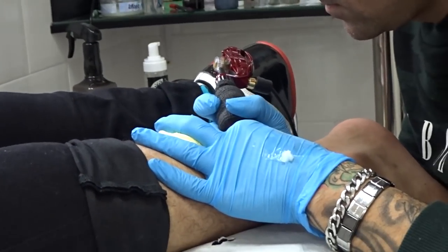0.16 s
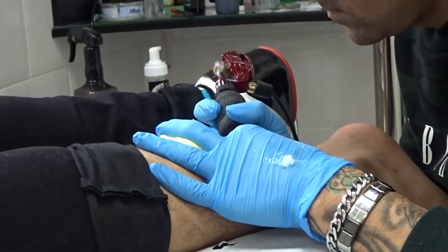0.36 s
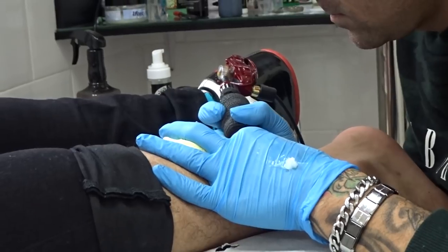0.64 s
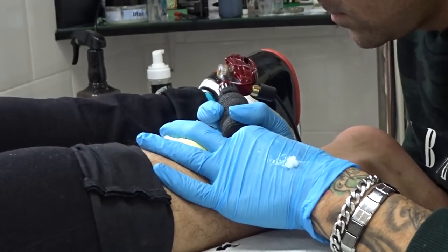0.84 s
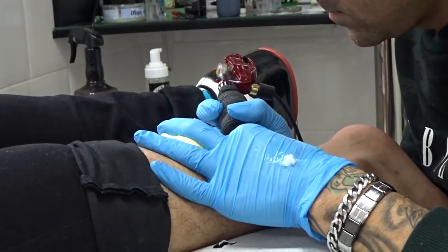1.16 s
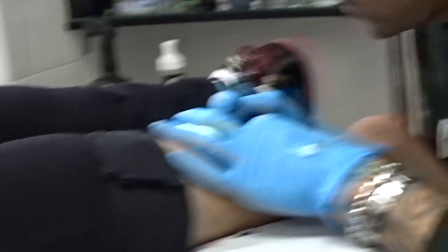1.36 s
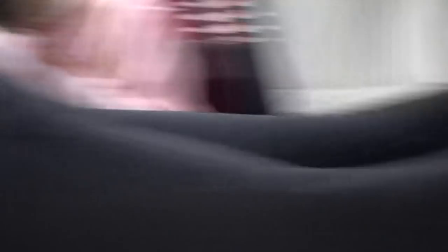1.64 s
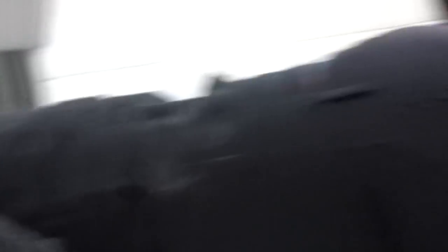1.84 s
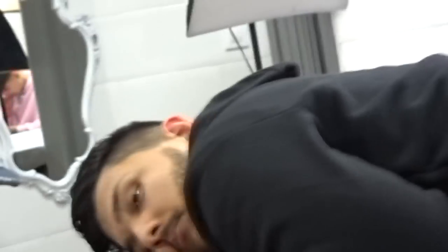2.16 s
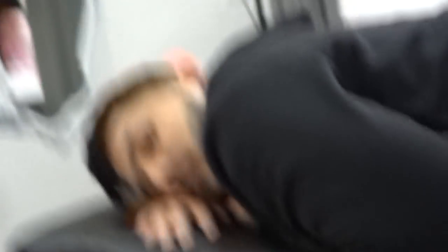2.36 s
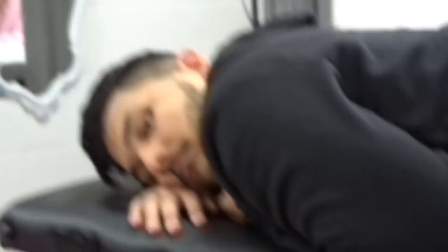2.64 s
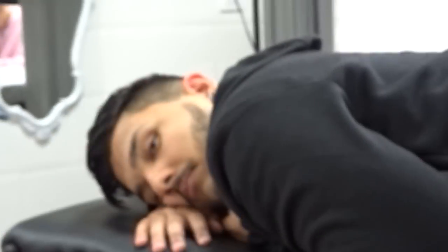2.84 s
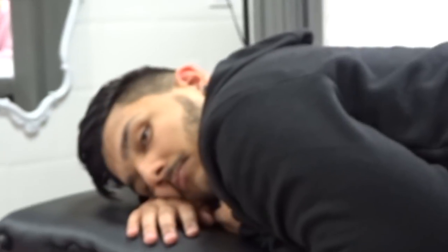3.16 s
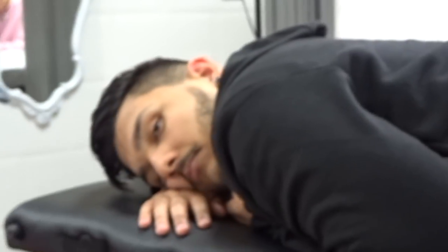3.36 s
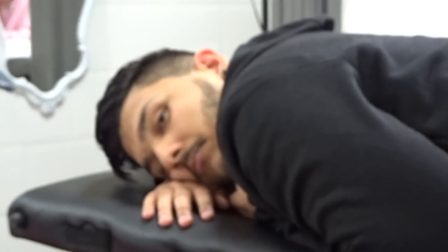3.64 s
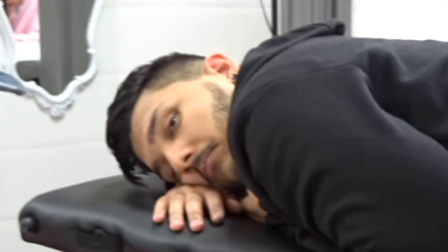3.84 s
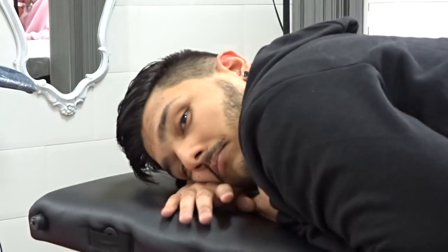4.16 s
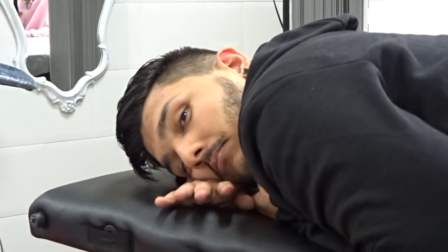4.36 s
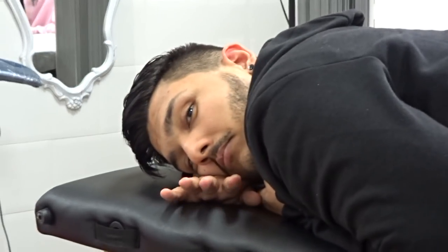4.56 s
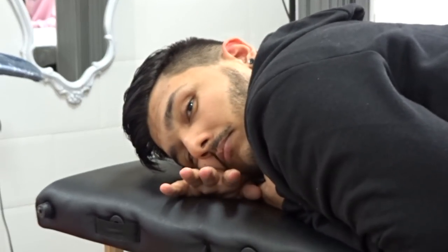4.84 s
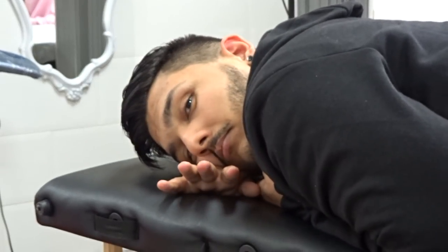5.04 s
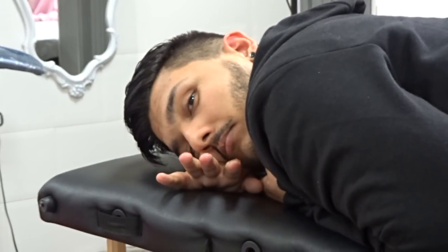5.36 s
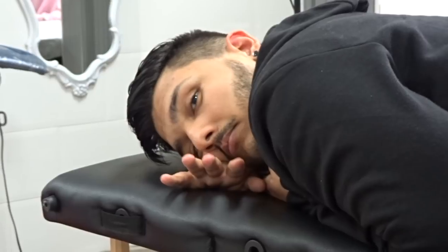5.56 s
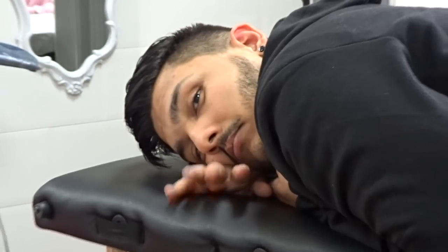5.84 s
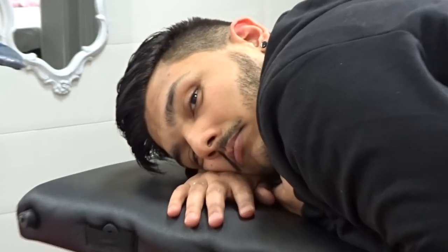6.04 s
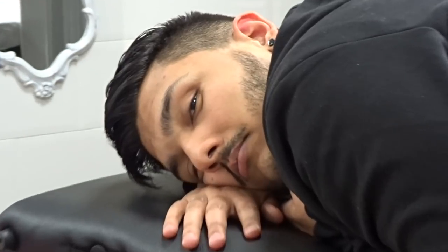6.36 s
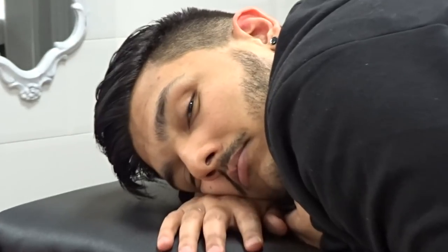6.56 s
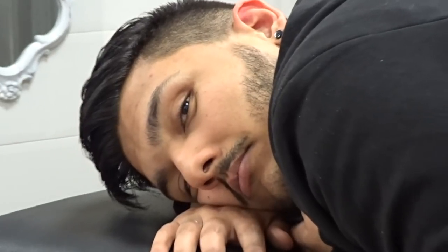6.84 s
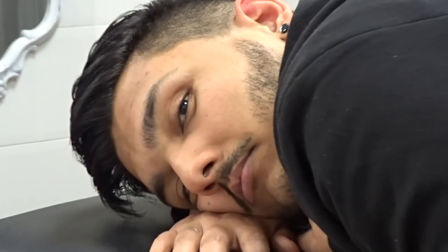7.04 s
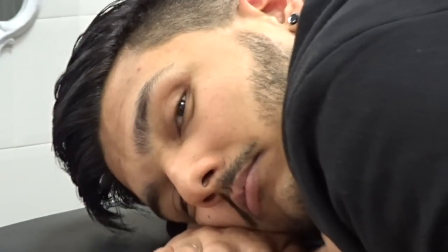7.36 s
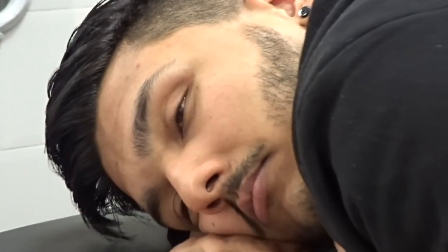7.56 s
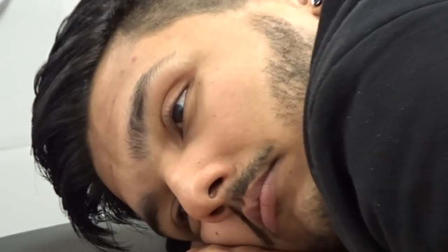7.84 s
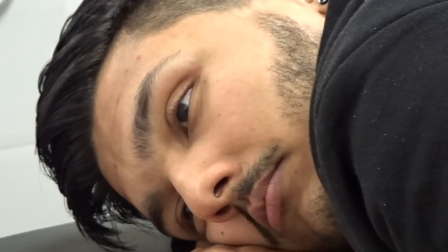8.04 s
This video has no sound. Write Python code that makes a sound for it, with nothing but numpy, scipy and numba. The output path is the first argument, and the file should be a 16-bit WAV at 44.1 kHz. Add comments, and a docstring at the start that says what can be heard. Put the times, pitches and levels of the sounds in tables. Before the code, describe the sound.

Thin, wavering electric whine with metallic rattle, weakening after a loud snap at two seconds; light knocks, then soft wiping and a final small click.

```python
"""In a small tiled studio a rotary tattoo machine whines, heard by a hand-held camera that turns away from it.
Sines at sums of its shaft and ball rates make the tones; taps of the balls of a worn bearing ring casing modes.
Filtered noise hisses through the room; a sharp click, small clicks, knocks, wipes, blips and a faint hum
are added. Gain control ducks a few milliseconds after the loudest peaks and creeps back."""
import sys
import numpy as np
from scipy import signal
from scipy.fft import rfft, irfft
from scipy.io import wavfile
from scipy.ndimage import uniform_filter1d, map_coordinates
from numba import njit

SR = 44100
rng = np.random.default_rng(int(sys.argv[2]) if len(sys.argv) > 2 else 0)


def unload_wav(signal):
    """Save mono or channel-first audio to the path in sys.argv[1] as 16-bit WAV at rate SR, clipped to [-1, 1]."""
    wavfile.write(
        sys.argv[1],
        SR,
        np.round(np.clip(np.atleast_2d(signal).T, -1, 1) * 32767).astype(np.int16),
    )


N = 361158
T = np.arange(N) / SR


def undb(db):
    """Amplitude ratio of a level in decibels."""
    return 10 ** (np.asarray(db) / 20)


def unit(x):
    """Normalisation to an rms of 1."""
    return x / np.sqrt(np.mean(x ** 2))


def columns(table):
    """Linear interpolation: every column after the time, at each sample."""
    s, *rest = np.transpose(table)
    return [np.interp(T, s, c) for c in rest]


def at_hz(points):
    """Interpolation over log frequency: a (hz, value) table on the transform's bins."""
    hz, value = np.transpose(points)
    return np.interp(np.log(np.fft.rfftfreq(N, 1 / SR) + 1), np.log(hz), value)


def ring(x, hz, width_hz):
    """Resonance: one second-order mode with gain 1 at its centre."""
    return signal.lfilter(*signal.iirpeak(hz, hz / width_hz, fs=SR), x)


def walk(rate):
    """Slow random modulation: normal values held 1 / rate s, then smoothed twice."""
    hold = int(SR / rate)
    steps = np.repeat(rng.standard_normal(N // hold + 1), hold)
    return uniform_filter1d(uniform_filter1d(steps, hold), hold)[:N]


# likeness of left and right in a diffuse field: hz [Hz], likeness [-1 to 1]
LIKENESS = [(60, 0.31), (130, 0.92), (290, 1), (640, 0.89), (1410, 0.62), (3100, 0.38), (6820, -0.33),
            (15000, 0.19)]


def hiss(colour, spread=0.92):
    """Diffuse-field noise: a coloured spectrum, with likeness of the sides set by frequency and spread."""
    alike = np.clip(1 - spread * (1 - at_hz(LIKENESS)), -1, 1)
    shape = undb(at_hz(colour))
    mid = rfft(rng.standard_normal(N)) * shape * np.sqrt(1 + alike)
    side = rfft(rng.standard_normal(N)) * shape * np.sqrt(1 - alike)
    return unit(irfft([mid + side, mid - side], N))


def place(x, pan_db, lag_s):
    """Localisation by level and time differences: the left side hears x lag_s later."""
    left = map_coordinates(x, [np.arange(N) - lag_s * SR], order=3)
    return np.array([left * undb(pan_db / 2), x * undb(-pan_db / 2)])


def echo(x, t60_s):
    """Reverberation: a decaying noise response, unrelated left and right, of unit energy."""
    s = np.arange(int(t60_s * SR)) / SR
    tail = rng.standard_normal((2, len(s))) * np.exp(-np.log(1000) * s / t60_s)
    tail = tail / np.sqrt(np.sum(tail ** 2, axis=1, keepdims=True))
    return signal.fftconvolve(x[None], tail, axes=1)[:, :N]


SWAYS_PER_S = 2.5  # the hand never holds still, so the pattern of reflections keeps changing


def swaying_echo(x, t60_s, count):
    """Changing reflections: several returns of the walls blended by drifting shares of equal total power."""
    share = np.array([walk(SWAYS_PER_S) for _ in range(count)])
    share = share / np.sqrt(np.sum(share ** 2, axis=0))
    return sum(echo(x * w, t60_s) for w in share)


FREE_WHINE_HZ = 2412  # whine of the unloaded motor
# needle strokes that slow the motor: slowest_s [s], whine_drop_hz [Hz], press_s [s], lift_s [s]
NEEDLE_STROKES = [(0.541, 21.6, 0.6, 0.19), (1.079, 16.3, 0.41, 0.41), (1.64, 25.2, 0.23, 0.12),
                  (2.15, 14.8, 0.45, 0.45), (2.641, 18.2, 0.35, 0.46), (2.95, 15.9, 0.14, 0.87),
                  (3.68, 27.7, 0.22, 0.24), (4.32, 22.2, 0.26, 0.27), (4.899, 24.4, 0.47, 0.58),
                  (5.649, 14.1, 0.11, 0.49), (5.981, 17, 0.2, 0.9), (6.71, 22.6, 0.2, 0.23),
                  (7.2, 21.6, 0.27, 0.098), (7.62, 21.3, 0.32, 0.12), (8.29, 30, 0.58, 0.7)]


def whine_pitch():
    """Speed under load: the free pitch less a smooth sag per stroke, deepening in the press, easing in the lift."""
    sag_hz = 0
    for slowest_s, drop_hz, press_s, lift_s in NEEDLE_STROKES:
        width_s = np.where(T < slowest_s, press_s, lift_s)
        sag_hz = sag_hz + drop_hz * np.exp(-2 * ((T - slowest_s) / width_s) ** 2)
    return FREE_WHINE_HZ - sag_hz


# orders below count cycles per ball passage; the whine and upper tone have their own levels
BALLS_PER_TURN, WHINE_ORDER, UPPER_ORDER = 4.378, 6, 7
# frequency of each tone as a sum: ball_multiple [count], shaft_multiple [count]
TONE_ORDERS = [(0, 7), (0, 13), (3, 0), (0, 15), (0, 17), (0, 18), (0, 19), (0, 20), (5, 0), (5, 1),
               (6, -1), (6, 0), (5, 5), (6, 1), (6, 2), (7, -2), (7, 0), (8, -4), (7, 1), (8, -2), (8, -1),
               (8, 0), (8, 1), (8, 2), (8, 3), (8, 4), (9, 0), (8, 5), (9, 1), (10, 0), (0, 3), (0, 4),
               (0, 9), (0, 10), (0, 16), (0, 21), (5, 6), (7, -3), (11, -5), (4, 13), (3, 20)]
# offset of each tone from the level that drives it: facing_db [dB], away_db [dB]
TONE_OFFSETS = [(-27.5, -27.5), (-53, -26), (-35, -26.5), (-21, -20), (-34, -28), (-23, -23), (-54, -25),
                (-25, -32), (-14.5, -12.5), (-27, -20), (-22, -21), (0.5, 1.5), (-15, -14.5), (-4.5, -8),
                (-37, -12), (-17, -21), (1, 2), (-28, -22), (-26, -20), (-22, -28), (-33, -20), (-20, -16),
                (-21, -21.5), (-17, -16), (-19, -26), (-26, -23), (-17, -22), (-34, -33), (-24, -18.5),
                (-20, -35), (-34.5, -37.5), (-35, -38.5), (-33, -28), (-30.5, -33.5), (-25.5, -28),
                (-27, -25.5), (-24, -15.5), (-35, -30), (-21.5, -25), (-36, -24), (-38, -25.5)]


def tones(ball, turn, whine_db, upper_db, others_db, dull_db):
    """Line spectrum of a rotating machine: sums of ball and shaft rates with one shared phase tremble."""
    out, tremble = 0, 0.003 * walk(120)
    for (balls, shafts), (facing_db, away_db) in zip(TONE_ORDERS, TONE_OFFSETS):
        order = balls + shafts / BALLS_PER_TURN
        cycles = (ball + tremble) * order + rng.random()
        if (balls, shafts) == (WHINE_ORDER, 0):
            level_db = whine_db + 0.8 * walk(110)
        elif (balls, shafts) == (UPPER_ORDER, 0):
            level_db = upper_db + 2.7 * walk(25)
        else:
            dull_share = np.clip((order - 6.5) / 2.32, 0, 1)
            level_db = others_db + 3.26 * walk(12) + 2.2 * walk(3.06) + dull_db * dull_share
        offset_db = facing_db + (away_db - facing_db) * turn
        out = out + undb(offset_db + level_db) * np.sin(2 * np.pi * cycles)
    return np.sqrt(2) * out


# casing resonances: hz [Hz], width of one filter pass [Hz], facing_db [dB], away_db [dB]
CASING_MODES = [(2470, 23, -11.5, -12), (2567, 230, -8, -7), (3510, 670, -14, -13.5),
                (5290, 130, -12, -16.5), (5680, 150, -13.5, -12), (6357, 370, 1.5, 3), (6574, 260, -8, -4),
                (7370, 390, -9.5, -9), (9060, 900, -7.5, -4), (14800, 1000, -26, -21.5)]
# beats of the rattle: ball_multiple [count], shaft_multiple [count]
LOAD_BEATS = [(0, 1), (1, -1), (1, -2), (1, -3)]
# depth of each beat: depth [nepers]
LOAD_DEPTHS = [0.19, 0.15, 0.51, 0.3]


def rattle(ball, turn):
    """Modal excitation: ball taps and rolling noise, harder on the loaded side of the shaft, ring the casing."""
    tap = np.flatnonzero(np.diff(np.floor(ball)))
    jitter, strength = rng.standard_normal((len(tap), 2)).T
    load_nepers = 0
    for (balls, shafts), depth in zip(LOAD_BEATS, LOAD_DEPTHS):
        load_nepers = load_nepers + depth * np.cos(2 * np.pi * ball * (balls + shafts / BALLS_PER_TURN))
    taps = np.zeros(N)
    tap_at = np.clip(tap + np.round(2.2 * jitter).astype(int), 0, N - 1)
    np.add.at(taps, tap_at, undb(strength))  # scatter of 1 dB
    drive = np.exp(load_nepers) * (undb(-5.0) * unit(taps) + rng.standard_normal(N))
    out = 0
    for hz, width_hz, facing_db, away_db in CASING_MODES:
        mode_db = facing_db + (away_db - facing_db) * turn + 0.43 * walk(12)
        out = out + undb(mode_db) * unit(ring(ring(drive, hz, width_hz), hz, 0.99 * width_hz))
    return out


JOLT_HZ, JOLT_S = 2454, 0.0015  # JOLT_S: Gaussian width of a ping
# random jolts: the weakest level, and the mean excess above it
SMALL_JOLTS_PER_S, SMALL_JOLT_LEAST_DB, SMALL_JOLT_EXCESS_DB = 20, -38, 2.5
# strong jolts of the needle bar that ping the casing: top_s [s], level_db [dB, peak before placing]
STRONG_JOLTS = [(3.243, -25), (3.541, -26), (3.826, -24), (3.859, -25), (5.119, -31), (5.839, -24),
                (5.874, -25), (5.927, -31), (5.961, -27), (6.049, -29), (6.137, -34), (6.226, -37),
                (6.561, -31), (6.575, -24), (6.608, -23), (6.640, -27), (7.493, -28)]


def jolts():
    """Impulsive excitation: pings of a few milliseconds, the strong ones listed and weaker ones at random."""
    chance = rng.random((int(SMALL_JOLTS_PER_S * N / SR), 2))
    small_db = SMALL_JOLT_LEAST_DB - SMALL_JOLT_EXCESS_DB * np.log(chance[:, 1])
    small = np.c_[chance[:, 0] * N / SR, small_db]
    s, db = np.r_[STRONG_JOLTS, small].T
    kicks, around = np.zeros(N), np.arange(-512, 513) / SR
    np.add.at(kicks, (s * SR).astype(int), undb(db))
    ping = np.exp(-.5 * (around / JOLT_S) ** 2) * np.cos(2 * np.pi * JOLT_HZ * around)
    return signal.fftconvolve(kicks, ping, mode="same")


EAR_LAG_S = 7.2e-5  # left behind right once the machine is off to the right
SHADE_S, SHADE_WIDTH_S, SHADE_DB = 2.02, .13, -8  # tones other than whine and upper fade for a moment
# drive of the whine: time_s [s], level_db [dB]
WHINE_LEVEL = [(0, -30.5), (.13, -34.5), (.4, -30), (.62, -34), (1.25, -31.5), (1.5, -35.5), (1.7, -35.5),
               (1.8, -42), (1.92, -46), (1.98, -41), (2.06, -43), (2.12, -33), (2.4, -40.5), (2.55, -34.5),
               (2.64, -43.5), (2.8, -36.5), (3.55, -35), (3.72, -29), (3.79, -38.5), (4.07, -28),
               (4.29, -36.5), (4.45, -30.5), (4.82, -38.5), (4.93, -31.5), (5.07, -38), (5.4, -29),
               (5.5, -34), (5.57, -29.5), (5.9, -38), (6.27, -33), (6.62, -34.5), (6.73, -32), (6.98, -32),
               (7.16, -36), (7.39, -29), (7.55, -37.5), (7.96, -31), (8.19, -38)]
# drive of the tone one ball multiple above the whine: time_s [s], level_db [dB]
UPPER_LEVEL = [(0, -47), (.3, -41), (.55, -52), (.77, -39.5), (1.09, -47), (1.35, -40), (1.62, -46),
               (1.9, -46), (2.3, -56), (3.3, -55.5), (4.3, -49), (4.54, -64), (4.86, -51), (5.5, -51),
               (5.75, -61), (6.05, -51), (6.4, -69), (6.74, -52), (6.9, -57), (7.87, -54), (8.19, -43)]
# casing rattle and side of the machine: time_s [s], rattle_db [dB], left_minus_right_db [dB]
RATTLE_AND_PAN = [(0, -30.5, -1.5), (0.6, -31, -3), (1.6, -30.5, -4.5), (2.0, -33.5, -8), (2.1, -31.5, 4),
                  (2.2, -35.5, -7.5), (3.3, -36.5, -3), (4.3, -34.5, -3.5), (5.6, -34.5, -2.5),
                  (5.9, -35, -5), (6.6, -35.5, -5), (7.5, -34.5, -4), (8.19, -35, -4)]


def machine(turn, dull_db):
    """Direct and reflected sound: tones and rattle share one speed; the rattle comes largely off the tiles."""
    whine_db, = columns(WHINE_LEVEL)
    upper_db, = columns(UPPER_LEVEL)
    rattle_db, pan_db = columns(RATTLE_AND_PAN)
    ball = np.cumsum(whine_pitch()) / WHINE_ORDER / SR  # ball passages so far
    shade_db = SHADE_DB * np.exp(-.5 * ((T - SHADE_S) / SHADE_WIDTH_S) ** 2)
    others_db = rattle_db + 2.37 * turn - 3.0 + shade_db
    pure = tones(ball, turn, whine_db, upper_db, others_db, dull_db)
    pure = pure + turn * jolts()  # pings are heard only once turned away
    rough = undb(rattle_db) * rattle(ball, turn)
    direct = place(pure, pan_db, EAR_LAG_S * turn)
    direct = direct + undb(-10.0) * place(rough, 0.75 * pan_db, EAR_LAG_S * turn)
    return direct + undb(-16.5) * echo(pure, .3) + undb(-1.5) * swaying_echo(rough, .3, count=4)


CLICK_TILT_HZ = 6000  # pivot of the spectral tilt
CLICK_BODY_HZ, CLICK_BODY_WIDTH_HZ = 980, 790  # width of one filter pass
# clicks: start_s [s], tick_peak_db [dB], left_minus_right_db [dB], body_re_tick_db [dB], tilt [dB per octave]
CLICK_EVENTS = [(2.1372, -4, -4.5, -26, 2), (2.195, -19, 1.0, -15, -1), (4.6900, -18, -5, -9.5, -8),
                (8.077, -13, -6, -28, 3)]
# click resonances: hz [Hz], width of one filter pass [Hz], level_db [dB]
CLICK_MODES = [(2000, 1400, -7), (3270, 794, 1), (3860, 1300, 0), (5300, 1200, -3), (8000, 4090, 3),
               (11400, 4000, 0), (14600, 1600, 5)]


def clicks():
    """Transient response: bursts of about a millisecond, differing between sides, ring modes over a duller body."""
    out, s = np.zeros((2, N)), np.arange(512) / SR
    for t, db, pan_db, body_db, tilt_db in CLICK_EVENTS:
        envelope = s * np.exp(-s / 0.00022) + 2e-5 * np.exp(-s / 0.0015)
        burst = rng.standard_normal((2, 512)) * envelope
        tick = 0
        for hz, width_hz, mode_db in CLICK_MODES:
            tilted_db = mode_db + tilt_db * np.log2(hz / CLICK_TILT_HZ)
            tick = tick + undb(tilted_db) * unit(ring(ring(burst, hz, width_hz), hz, width_hz))
        impulse = 1. * (s == 0)
        body = ring(impulse, CLICK_BODY_HZ, CLICK_BODY_WIDTH_HZ)
        body = ring(body, CLICK_BODY_HZ, CLICK_BODY_WIDTH_HZ)
        both = tick / np.abs(tick).max(axis=1, keepdims=True) + undb(body_db) * body / np.abs(body).max()
        start = int(t * SR)
        out[:, start:start + 512] += both * undb(db + np.array([[pan_db], [-pan_db]]) / 2)
    return out


PUSH_S = .00008  # time from contact to greatest push
THUD_HZ, THUD_WIDTH_HZ = 438.6, 140  # first filter pass; the second is twice as wide
SNAP_HZ, SNAP_WIDTH_HZ = 3080, 870  # likewise
# knocks, peaks before panning: start_s [s], clack_db [dB], left_minus_right_db [dB], thud_db [dB],
# snap_db [dB], snap_after_s [s], echo_re_clack_db [dB]
KNOCK_EVENTS = [(2.7115, -50, 0, -33, -50, .008, -20), (2.7202, -19, 2, -34, -19.5, 0.0075, 5),
                (2.9684, -19, 1, -50, -34, 0.0098, 3), (3.3329, -17, 3, -53, -17, 0.0070, 3)]
# clack resonances: hz [Hz], width of the first filter pass [Hz], level_db [dB]
CLACK_MODES = [(800, 730, -2), (1390, 280, 6), (1850, 880, 4), (2860, 1100, -4)]


def knocks():
    """Impact: a short push rings broad woody modes over a soft thud; a dry snap and the room's return follow."""
    def peak(x, db):
        """Normalisation to a peak level."""
        return undb(db) * x / np.abs(x).max()

    dry, wet, s = np.zeros((2, N)), np.zeros(N), np.arange(4096) / SR
    for t, db, pan_db, thud_db, snap_db, after_s, echo_db in KNOCK_EVENTS:
        grit = rng.standard_normal((3, 4096))
        contact = s / PUSH_S * np.exp(-s / PUSH_S) + 0.12 * grit[0] * np.exp(-s / 0.0041)
        clack = 0
        for hz, width_hz, mode_db in CLACK_MODES:
            clack = clack + undb(mode_db) * unit(ring(ring(contact, hz, width_hz), hz, 2 * width_hz))
        thud = ring(ring(contact, THUD_HZ, THUD_WIDTH_HZ), THUD_HZ, 2 * THUD_WIDTH_HZ)
        snap = grit[1] * (s > after_s) * np.exp(-np.abs(s - after_s) / 0.00076)
        snap = ring(ring(snap, SNAP_HZ, SNAP_WIDTH_HZ), SNAP_HZ, 2 * SNAP_WIDTH_HZ)
        blow = peak(clack, db) + peak(thud, thud_db) + peak(snap, snap_db)
        start = int(t * SR)
        dry[:, start:start + 4096] += blow * undb(np.array([[pan_db], [-pan_db]]) / 2)
        wet[start:start + 4096] += undb(db + echo_db) * grit[2] * s / 0.0048 * np.exp(1 - s / 0.0051)
    return dry + echo(ring(ring(wet, 2000, 4600), 1700, 4300), 0.46)


# wipes: top_s [s], rise_s [s], fall_s [s], body_db [dB], treble_db [dB]
WIPE_EVENTS = [(4.22, 0.19, 0.24, -43.5, -50), (5.6, 0.088, 0.19, -56, -56), (6.1, 0.093, 0.16, -45.5, -61),
               (7.14, 0.18, .16, -37.5, -45), (7.412, 0.011, 0.27, -38, -49), (7.5, 0.07, 0.08, -40, -44),
               (7.59, 0.04, 0.08, -38, -44), (7.96, 0.046, 0.047, -38, -48),
               (8.045, 0.093, 0.088, -33.5, -39.5)]
# relative spectrum of the body: hz [Hz], density [dB per Hz]
WIPE_BODY_COLOUR = [(500, -28.5), (1000, -8), (1300, -1), (1600, 1.5), (2200, 1), (3200, -10), (6000, -43),
                    (12000, -46)]
# relative spectrum of the treble: hz [Hz], density [dB per Hz]
WIPE_TREBLE_COLOUR = [(1800, -34), (2800, 5), (3400, 1), (4200, -7), (6000, -53), (12000, -40)]


def wipes():
    """Friction noise: something soft dragged over a smooth surface, in grainy swells each with its own treble."""
    body_power = treble_power = 0
    for t, rise_s, fall_s, db, treble_db in WIPE_EVENTS:
        swell = np.exp(-2 * ((T - t) / np.where(T < t, rise_s, fall_s)) ** 2)
        body_power = body_power + undb(2 * db) * swell
        treble_power = treble_power + undb(2 * treble_db) * swell
    grain = undb(2 * walk(150))
    body = np.sqrt(body_power) * hiss(WIPE_BODY_COLOUR, spread=0.53)
    treble = np.sqrt(treble_power) * hiss(WIPE_TREBLE_COLOUR, spread=0.56)
    return grain * (body + treble)


BLIP_S = 0.0092  # Gaussian width
# faint blips: centre_s [s], pitch_hz [Hz], level_db [dB, rms of the sine at its top]
BLIP_EVENTS = [(4.91, 980, -51), (5.50, 1251, -42), (5.575, 1382, -44), (5.64, 1400, -46),
               (5.805, 1720, -43), (6.02, 928.4, -47), (6.04, 1260, -44), (6.15, 1450, -46),
               (6.759, 475, -43), (6.782, 521, -51)]


def blips():
    """Tone bursts: sines under Gaussian envelopes, with the reverberation of the room."""
    dry = 0
    for t, hz, db in BLIP_EVENTS:
        envelope = np.exp(-.5 * ((T - t) / BLIP_S) ** 2)
        dry = dry + undb(db) * envelope * np.sin(2 * np.pi * hz * T)
    return np.sqrt(2) * (dry + undb(-2.5) * echo(dry, 0.4))


# a faint low tone: time_s [s], pitch_hz [Hz], level_db [dB rms]
HUM_TRACK = [(1.2, 131, -89), (1.85, 132, -96), (2.05, 132.3, -76), (3.0, 136, -69), (4.08, 138.9, -77),
             (4.3, 141.1, -84), (5.3, 141.6, -76.5), (6.2, 143.2, -81)]


def hum():
    """Frequency modulation: a thin low sine follows a drifting pitch and level."""
    hz, db = columns(HUM_TRACK)
    fade = np.clip((T - HUM_TRACK[0][0]) * 2, 0, 1) * np.clip((HUM_TRACK[-1][0] - T) * 2, 0, 1)
    return np.sqrt(2) * fade * undb(db) * np.sin(2 * np.pi * np.cumsum(hz) / SR)


# relative spectrum of the low hiss: hz [Hz], facing [dB per Hz], away [dB per Hz]
LOW_COLOUR = [(110, -44, -48), (165, -22, -19.5), (271, -8, -4.5), (373, 0, 4.5), (487, -1, -1.5),
              (710, 3, 3), (950, -0.5, 3), (1400, -1, 0.5), (2390, 0.5, 4.5), (3530, -44, -46)]
# relative spectrum of the high hiss: hz [Hz], density [dB per Hz]
HIGH_COLOUR = [(1200, -19.5), (2500, 3.5), (4600, 4), (8000, 1.5), (10000, -9.5), (12000, -40)]
# relative spectrum of the topmost hiss: hz [Hz], density [dB per Hz]
TOP_COLOUR = [(7000, -22.5), (10000, 1), (12500, -9.5), (16000, 3.5)]
# room hiss: time_s [s], low_db [dB], high_db [dB], top_db [dB]
HISS_LEVELS = [(0, -41.5, -36, -35), (1.6, -42, -36.5, -35.5), (2.15, -41.5, -38, -38),
               (2.5, -43, -40, -42), (2.85, -41, -38.5, -34), (3.35, -42, -39, -40),
               (5.55, -41.5, -38.5, -39), (5.9, -43.5, -55, -53), (6.3, -44, -63, -79),
               (7.9, -44.5, -58, -66), (8.07, -42.5, -37, -34), (8.19, -39.5, -40, -42)]


def room_hiss(turn):
    """Band noise: three fluctuating bands fill the room; the low one crossfades its colour with the turn."""
    low_db, high_db, top_db = columns(HISS_LEVELS)
    hz, facing_db, away_db = np.transpose(LOW_COLOUR)
    low = np.sqrt(1 - turn) * hiss(np.c_[hz, facing_db]) + np.sqrt(turn) * hiss(np.c_[hz, away_db])
    room = undb(low_db + walk(4.857)) * low
    room += undb(high_db + walk(6.43)) * hiss(HIGH_COLOUR)
    room += undb(top_db + walk(26.05)) * hiss(TOP_COLOUR)
    return room


DULL_BELOW_DB, DULL_SHARE = -42.5, 0.34  # high-hiss level where dulling starts; dB of dulling per dB below


def dulling():
    """Treble loss: where the high hiss sinks, the upper tones of the machine sink with it."""
    _, high_db, _ = columns(HISS_LEVELS)
    return DULL_SHARE * np.clip(high_db - DULL_BELOW_DB, -20, 0)


# turn of the camera: time_s [s], share turned away [0-1]
CAMERA_TURN = [(0, 0), (1.6, 0), (2.3, 1), (8.19, 1)]


def scene():
    """Superposition: the machine, the handling sounds and the room add linearly."""
    turn, = columns(CAMERA_TURN)
    handling = clicks() + knocks() + wipes()
    return machine(turn, dulling()) + handling + blips() + hum() + room_hiss(turn)


@njit
def duck(peak, top, ratio, release):
    """Compression: gain drops at once on a peak over the top and creeps back."""
    gain, envelope = np.empty(len(peak)), top
    for i in range(len(peak)):
        envelope = max(peak[i], envelope + (top - envelope) * release)
        gain[i] = (top / envelope) ** (1 - 1 / ratio)
    return gain


TOP_HZ, RUMBLE_DB = 15720, -81  # upper cutoff; rms of the bass floor
# relative spectrum of the steady bass floor: hz [Hz], density [dB per Hz]
RUMBLE_COLOUR = [(20, -4), (60, 6), (150, -1), (300, -22), (1000, -70)]


def record(dry):
    """Band limiting and late gain control: the microphone drops bass, a bass floor joins, the top is cut."""
    dry = signal.sosfilt(signal.butter(2, 120, "high", fs=SR, output="sos"), dry)
    gain = duck(np.abs(dry).max(axis=0), 0.38, 3.0, 1 / (.6 * SR))  # release of 0.6 s
    late = np.r_[np.ones(128), uniform_filter1d(gain, size=128)[:-128]]  # delayed by 128 samples
    heard = dry * late + undb(RUMBLE_DB) * hiss(RUMBLE_COLOUR, spread=0.65)
    return signal.sosfilt(signal.ellip(12, .2, 70, TOP_HZ, fs=SR, output="sos"), heard)


dry = scene()
out = record(dry)
unload_wav(out)
```